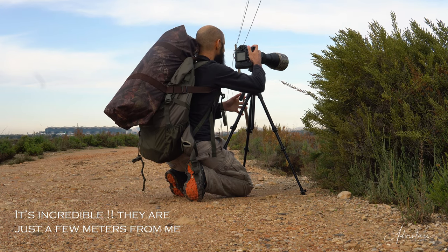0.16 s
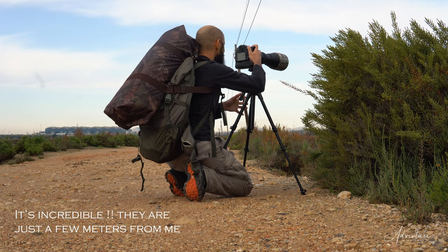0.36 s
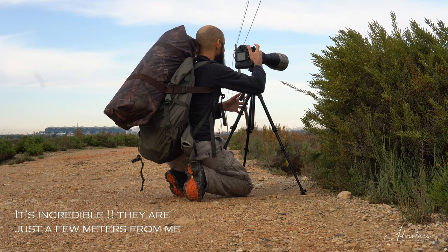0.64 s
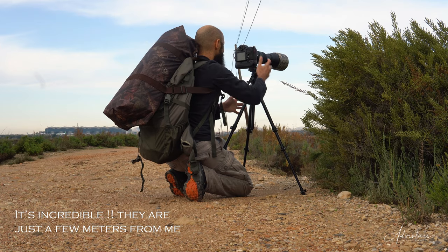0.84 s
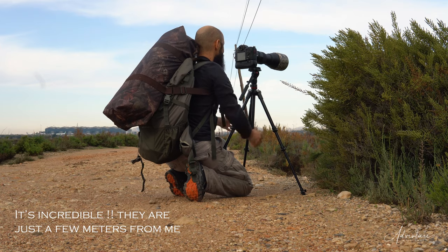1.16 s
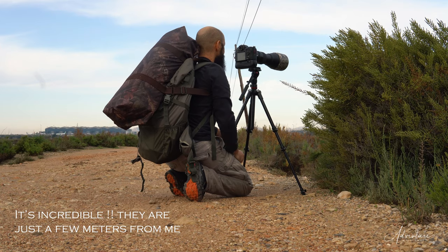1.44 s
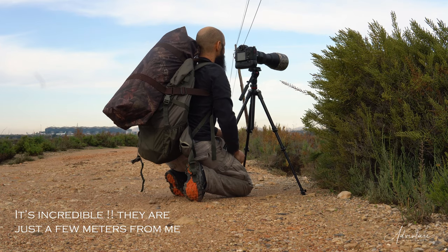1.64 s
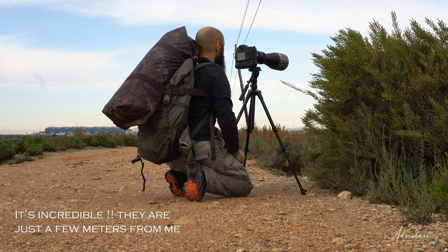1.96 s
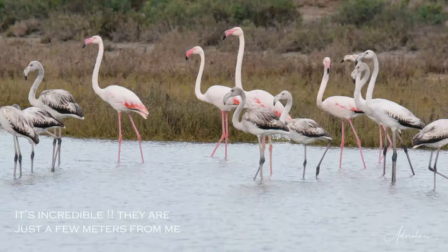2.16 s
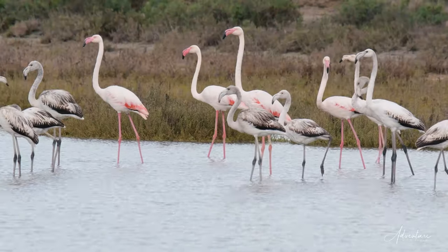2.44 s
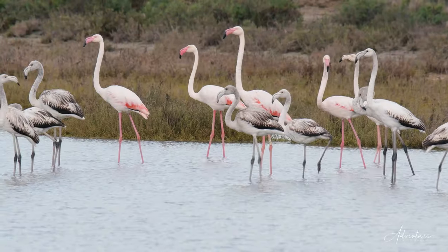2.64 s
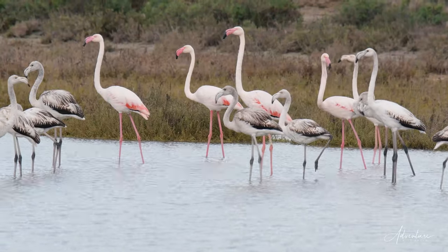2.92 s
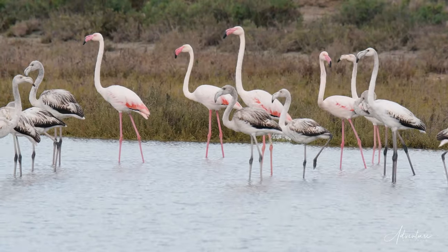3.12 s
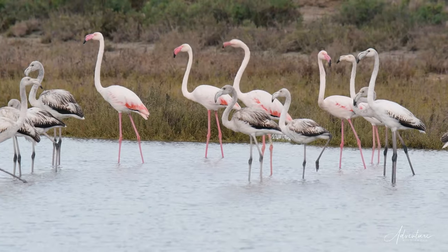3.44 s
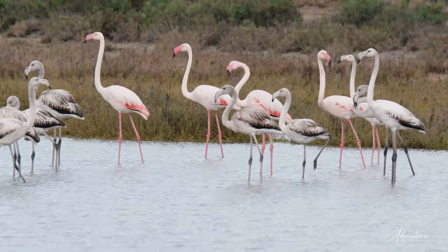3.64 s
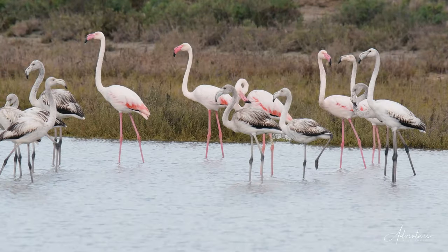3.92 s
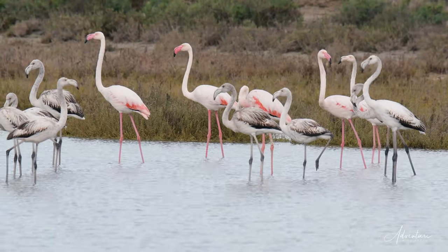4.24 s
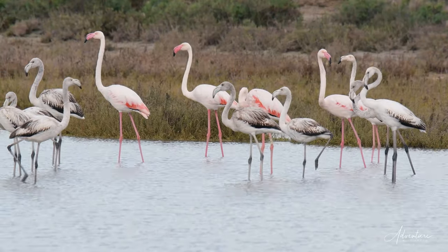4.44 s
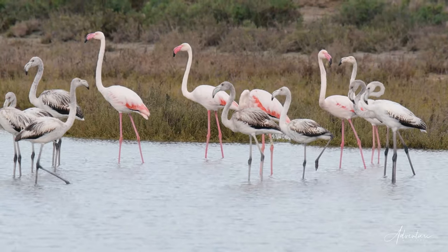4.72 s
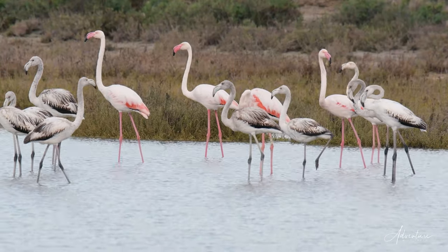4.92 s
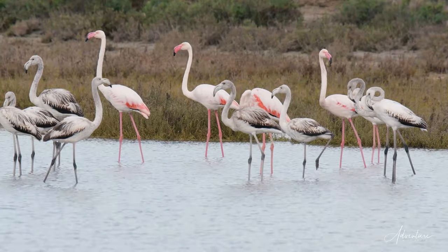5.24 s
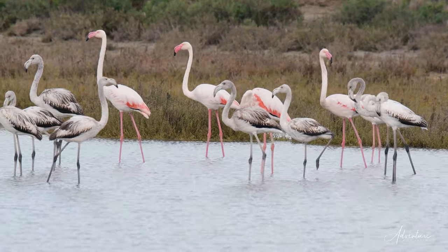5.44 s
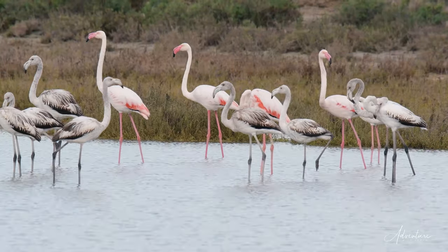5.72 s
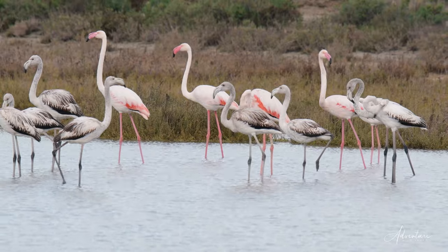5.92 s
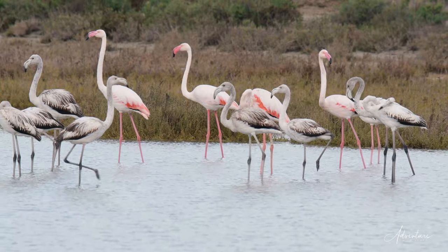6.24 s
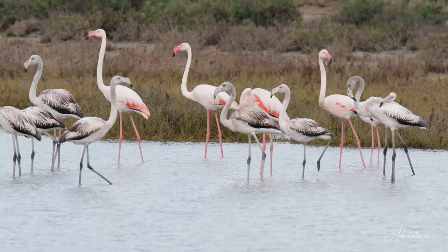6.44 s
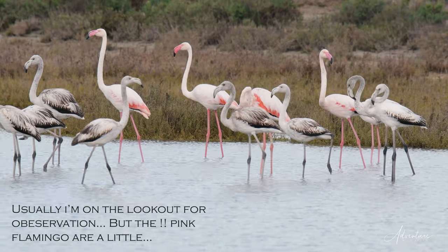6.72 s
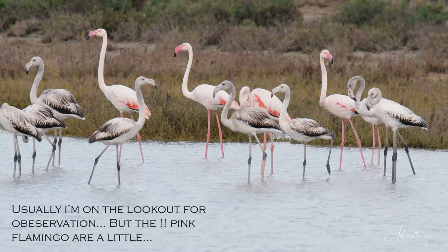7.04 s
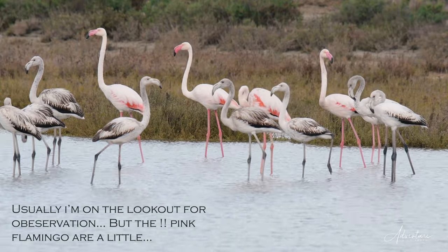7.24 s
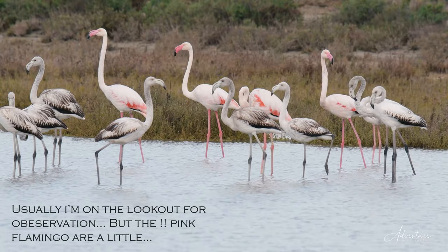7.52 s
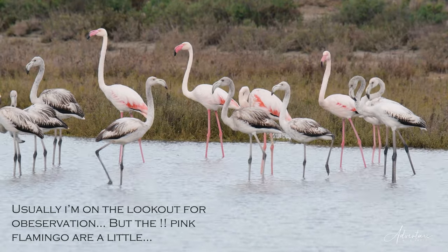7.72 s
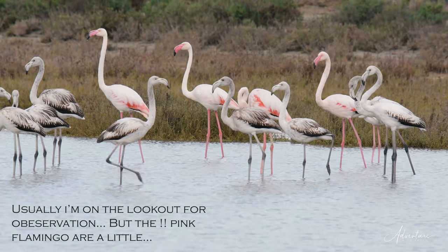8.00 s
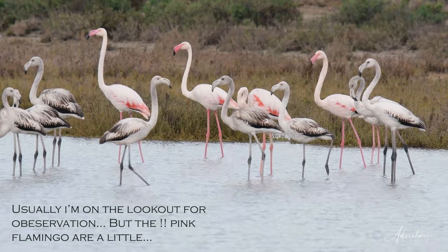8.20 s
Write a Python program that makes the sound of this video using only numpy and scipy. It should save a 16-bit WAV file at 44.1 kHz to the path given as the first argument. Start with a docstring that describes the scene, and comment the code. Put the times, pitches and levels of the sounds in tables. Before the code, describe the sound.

For about eight seconds, low soft wind rumbles over an open lagoon, slowly easing, with a brief gust at the very start, more around 1.8 to 2.2 and a weak one near 7.3. Behind it a far road drones continuously, its tyre roar swelling gently around 0.8, 3 to 4 and 5.7. Brush swishes and rustles lightly, fading overall, with leaves stirring again near 6.9. Thin high songbird chips, bending in pitch, start at 0.3 and 0.7 and recur sparsely. Small dry ticks fall between 0.8 and 2.5. A flamingo gives very short nasal, reedy yelps at 1.5, 2.2, 3.4, 5.5, 6.3 and 7.6, the first strongest and the fourth very faint. Hoarse, distant cries glide faintly around 3.0 to 3.7, 4.6, 6.6 and 7.3. The birds have a faint short outdoor tail; soft microphone hiss lies underneath.

```python
"""A lagoon in light wind, about eight seconds. Throughout, shaped noise makes a low, slowly easing rumble
of air, the drone and roar of a far-off road, and the swish and rustle of brush.
From the first moments a songbird chips now and then, in thin whistles that bend in pitch.
Short noise bursts tick between 0.8 and 2.5 s. From 1.5 s a wading bird gives six nasal yelps, each a
whistle over reedy harmonics, and from 3 s thin, hoarse glides are the cries of birds further off."""
import sys
import numpy as np
from scipy import signal
from scipy.fft import rfft, irfft
from scipy.io import wavfile
from scipy.ndimage import uniform_filter1d

SR = 44100
rng = np.random.default_rng(int(sys.argv[2]) if len(sys.argv) > 2 else 0)


def generate_wav(signal):
    """Clip the signal to [-1, 1] and save it as 16-bit WAV at the path in sys.argv[1]."""
    frames = np.transpose(np.atleast_2d(signal))
    scaled = np.clip(frames, -1, 1) * 32767
    pcm = np.round(scaled).astype(np.int16)
    wavfile.write(sys.argv[1], SR, pcm)


N = 369116
T = np.arange(N) / SR  # the time of every sample, in s


def undb(db):
    """Turn decibels into a gain."""
    return 10 ** (np.asarray(db) / 20)


def unit(x):
    """Scale a signal to an rms of 1."""
    return x / np.sqrt(np.mean(x ** 2))


def response(hz, points):
    """Gain at the given frequencies, read off a (frequency [Hz], level [dB]) spectrum."""
    point_hz, point_db = np.transpose(points)
    # a tiny offset keeps the logarithm of 0 Hz finite
    return undb(np.interp(np.log(hz + 1e-9), np.log(point_hz), point_db))


def noise(points):
    """Noise of rms 1 with the given spectrum, falling away above its last point."""
    hz = np.fft.rfftfreq(N, 1 / SR)
    roll_off = 1 / np.maximum(hz / points[-1][0], 1) ** 2
    white_spectrum = rfft(rng.standard_normal(N))
    return unit(irfft(white_spectrum * response(hz, points) * roll_off, N))


def walk(rate):
    """Random levels of rms 1, drawn `rate` times a second and smoothed twice."""
    hold = max(int(SR / rate), 2)
    steps = np.repeat(rng.standard_normal(N // hold + 1), hold)
    smooth = uniform_filter1d(uniform_filter1d(steps, hold), hold)
    return unit(smooth[:N])


def flow(points, db, flicker_db, rate):
    """Turbulent noise whose level flickers around a curve."""
    return noise(points) * undb(db + flicker_db * walk(rate))


def swell(peak_s, length_s):
    """A smooth rise and fall of power, 1 at its peak and above a half for its length."""
    return .5 ** ((2 * (T - peak_s) / length_s) ** 2)


def surges(steady_db, events):
    """Level in dB of a steady flow with swells on top; their powers add."""
    power = undb(steady_db) ** 2
    for peak_s, length_s, db in events:
        power = power + undb(db) ** 2 * swell(peak_s, length_s)
    return 10 * np.log10(power)


def add(out, start, sound):
    """Mix a sound in, starting at a time in s."""
    i = max(int(start * SR), 0)
    out[i:i + len(sound)] += sound[:N - i]


def sing(hz, jitter, taper=0.62):
    """Phase and soft envelope of one note; its pitch trembles by the fraction `jitter` (rms)."""
    tremble = unit(uniform_filter1d(rng.standard_normal(len(hz)), size=60))
    phase = 2 * np.pi * np.cumsum(hz * (1 + jitter * tremble)) / SR
    # the root of 2 gives a sine an rms of 1 where the envelope is flat
    return phase, np.sqrt(2) * signal.windows.tukey(len(hz), taper)


def wind():
    """Low eddies of air: an easing breeze with a few gusts."""
    # how the rumble spreads over pitch: (frequency [Hz], relative level [dB per Hz])
    wind_colour = [(8, -5.5), (22, 1), (38, -0.5), (55, 1.5), (75, -1.5), (105, -3.5), (150, -7),
                   (185, -13), (230, -26), (400, -42), (900, -54)]
    # gusts on top of the breeze: (time of the peak [s], length [s], rumble level [dB])
    gusts = [(0.156, 0.082, -21.5), (1.81, 0.16, -24.5), (2.147, 1.1, -28), (7.3, 0.33, -30.5)]
    start_db, ease_db_per_s = -26.5, 0.26
    db = surges(start_db - ease_db_per_s * T, gusts)
    return flow(wind_colour, db, flicker_db=0.13, rate=31)


def traffic():
    """Levels in dB of the tyre roar and its bright edge; a vehicle's roar falls in power with distance squared."""
    # vehicles that stand out:
    # (time when nearest [s], time spent near [s], tyre roar level [dB], bright edge level [dB])
    vehicles = [(0.05, 0.3, -44, -47), (0.82, 0.39, -43.5, -39.5), (3.1, 0.71, -44, -50.5),
                (3.7, 0.67, -42, -45), (5.72, 0.35, -42, -46), (6.4, 0.59, -46.5, -44.5),
                (7.4, 0.48, -47, -46)]
    steady_tyre_db, steady_edge_db = -43.5, -48
    edge_falloff = 1.27  # the edge fades with distance faster than the roar, by this power
    tyre, edge = undb(steady_tyre_db) ** 2, undb(steady_edge_db) ** 2
    for nearest_s, near_s, tyre_db, edge_db in vehicles:
        nearness = 1 / (1 + (2 * (T - nearest_s) / near_s) ** 2)
        tyre = tyre + undb(tyre_db) ** 2 * nearness
        edge = edge + undb(edge_db) ** 2 * nearness ** edge_falloff
    return 10 * np.log10(tyre), 10 * np.log10(edge)


def road():
    """Engines drone and tyres roar from far off; the roar and its bright edge swell as vehicles pass."""
    # spectra of the drone, the roar and its bright edge: (frequency [Hz], relative level [dB per Hz])
    drone_colour = [(100, -6.5), (185, 4), (240, 0), (295, -1.5), (330, -1.5), (400, -6.5), (500, -8),
                    (650, -10), (900, -13.5), (1600, -36.5)]
    tyre_colour = [(400, -21.5), (700, -5), (850, -4), (1000, -0.5), (1150, -7.5), (1400, -19), (2200, -38)]
    edge_colour = [(800, -17.5), (1100, 0), (1280, 0), (1500, -6), (1750, -14.5), (2100, -20.5),
                   (2500, -33), (4000, -46.5)]
    # level of the engine drone: (time [s], level [dB])
    drone_levels = [(0, -35.5), (1.7, -36), (2.9, -36.5), (4.4, -34), (5.7, -36.5), (6.2, -35), (8.37, -35)]
    drone_db = np.interp(T, *np.transpose(drone_levels))
    tyre_db, edge_db = traffic()
    drone = flow(drone_colour, drone_db, flicker_db=0.28, rate=13)
    tyres = noise(tyre_colour) * undb(tyre_db)
    edge = flow(edge_colour, edge_db, flicker_db=.5, rate=12)
    return drone + tyres + edge


def brush():
    """Stems swish less as the breeze eases; flurries stir them and set the fine leaves rustling."""
    # spectra of the stems and of the leaves: (frequency [Hz], relative level [dB per Hz])
    swish_colour = [(1200, -7), (1900, 5), (2400, 1.5), (2900, -4), (3800, -29), (7000, -25)]
    rustle_colour = [(2000, -10), (3200, 5.5), (4200, 0.5), (5000, -3.5), (5800, -10), (6600, -16.5),
                     (9000, -23), (15000, -29)]
    # flurries: (time of the peak [s], length [s], swish level [dB], rustle level [dB])
    flurries = [(0.15, 0.23, -59.5, -80), (0.72, 0.22, -62, -68), (1.25, 0.44, -65, -68.5),
                (2.174, 0.19, -62, -68.5), (2.8, 0.3, -68, -70.5), (4.55, 0.51, -64, -71.5),
                (6.85, 0.88, -75, -67), (8.25, 0.6, -72, -71)]
    swish_start_db, swish_ease_db_per_s = -59, 1.03
    calm_rustle_db = -70.5  # leaves between flurries
    peak_s, length_s, swish_db, rustle_db = np.transpose(flurries)
    stems_db = surges(swish_start_db - swish_ease_db_per_s * T, zip(peak_s, length_s, swish_db))
    leaves_db = surges(calm_rustle_db, zip(peak_s, length_s, rustle_db))
    stems = flow(swish_colour, stems_db, flicker_db=.7, rate=17)
    leaves = flow(rustle_colour, leaves_db, flicker_db=1.4, rate=27)
    return stems + leaves


def ticks():
    """Each small snap is a burst of noise in one broad, steep-sided resonance."""
    # dry ticks of twigs and grit: (start [s], centre frequency [Hz], width of one filter pass [Hz],
    # peak level [dB], time for the burst to decay to 1/e [s])
    snaps = [(.812, 4100, 1200, -53, .005), (.878, 5800, 3000, -56, .005), (1.028, 3600, 1200, -49, .005),
             (1.335, 4870, 1600, -48, 0.0027), (1.378, 5300, 3000, -57, .005),
             (1.808, 2280, 1500, -42, 0.0033), (2.511, 5260, 2000, -57, .005)]
    out, t = np.zeros(N), T[:SR // 20]
    for start, hz, width_hz, db, decay in snaps:
        b, a = signal.iirpeak(hz, hz / width_hz, fs=SR)
        burst = rng.standard_normal(len(t)) * np.exp(-t / decay)
        # two passes make the sides of the resonance steeper
        ring = signal.lfilter(b, a, signal.lfilter(b, a, burst))
        add(out, start, undb(db) * ring / np.abs(ring).max())
    return out


def far_birds(jitter=0.049):
    """Faint glides from one pitch to another, made hoarse by a strong tremble."""
    # thin slurred cries: (start [s], length [s], first pitch [Hz], last pitch [Hz], level [dB])
    cries = [(3.02, 0.066, 2800, 3000, -69), (3.03, 0.137, 1900, 2060, -62), (3.10, .07, 3900, 4080, -72),
             (3.16, .05, 3050, 3170, -69), (3.62, 0.16, 3180, 2850, -67), (4.60, .03, 4150, 3800, -68),
             (4.712, .03, 3950, 3900, -74), (6.60, .06, 3600, 3950, -69), (6.66, .065, 3450, 2550, -65),
             (7.252, 0.032, 5350, 5250, -68), (7.28, .055, 3450, 3150, -73)]
    out = np.zeros(N)
    for start, length, first_hz, last_hz, db in cries:
        glide_hz = np.geomspace(first_hz, last_hz, int(length * SR))
        phase, envelope = sing(glide_hz, jitter)
        add(out, start, undb(db) * envelope * np.sin(phase))
    return out


def songbird(sweep=12, crest_s=0.0056, jitter=.016):
    """Thin whistles, each part of a round-topped arch of pitch; `sweep` is in octaves a second."""
    # chips: (start [s], length [s], time of the crest [s], crest pitch [Hz], level [dB])
    chips = [(0.26, 0.024, .258, 6200, -61.5), (0.660, 0.041, .689, 6020, -63.5),
             (2.368, 0.041, 2.381, 6030, -69), (2.770, .016, 2.785, 5800, -72),
             (3.83, 0.05, 3.849, 5950, -68), (4.120, .030, 4.148, 6100, -68),
             (5.588, .020, 5.585, 5700, -70), (6.915, .040, 6.925, 5800, -75),
             (7.234, .036, 7.260, 5820, -67), (7.421, .018, 7.441, 5900, -71)]
    out = np.zeros(N)
    for start, length, crest, crest_hz, db in chips:
        t = start + T[:int(length * SR)]
        # octaves below the crest; crest_s sets how round the top is
        fall = sweep * (np.hypot(t - crest, crest_s) - crest_s)
        phase, envelope = sing(crest_hz * 2 ** -fall, jitter)
        add(out, start, undb(db) * envelope * np.sin(phase))
    return out


def wader(arch=0.086, whistle_jitter=0.0055, reed_jitter=0.015, throat_octaves=0.39, count=6):
    """The two sides of the syrinx sound together: a rising whistle and a reedy, arching stack of harmonics."""
    # yelps: (start [s], length [s], middle pitch of the whistle [Hz], its rise [octaves], whistle level [dB],
    # top pitch of the reed [Hz], reed level before the throat [dB], throat resonance [Hz])
    yelps = [(1.455, 0.057, 2300, .01, -47, 1153, -66, 3900),
             (2.24, 0.06, 2385, .04, -50.5, 1165, -66, 4780),
             (3.424, 0.053, 2190, 0.19, -55, 1102, -66.5, 4600),
             (5.455, 0.034, 2450, .3, -66, 1275, -70, 4350),
             (6.311, .040, 2330, 0.22, -55.5, 1134, -64, 3820),
             (7.552, .034, 2580, 0.27, -58.5, 1290, -68, 4150)]
    out, k = np.zeros(N), np.arange(1, count + 1)  # k numbers the harmonics
    for start, length, whistle_hz, rise, whistle_db, reed_hz, reed_db, throat_hz in yelps:
        u = np.linspace(-1, 1, int(length * SR))  # from the start to the end of the yelp
        phase, envelope = sing(whistle_hz * 2 ** (rise * u / 2), whistle_jitter)
        add(out, start, undb(whistle_db) * envelope * np.sin(phase))

        phase, envelope = sing(reed_hz * 2 ** (-arch * u ** 4), reed_jitter, taper=0.34)
        # the throat passes the harmonics that lie near its resonance
        throat = np.exp(-(np.log2(k * reed_hz / throat_hz) / throat_octaves) ** 2)
        reed = throat @ np.sin(np.outer(k, phase))
        add(out, start, undb(reed_db) * envelope * reed)
    return out


def open_air(x, wet_db=-17, t60=.3):
    """Banks and scrub scatter a faint, short tail that falls 60 dB in t60 seconds."""
    t = T[:SR // 2]
    tail = rng.standard_normal(len(t)) * np.exp(-np.log(1000) * t / t60)
    scattered = signal.fftconvolve(x, tail / np.linalg.norm(tail))[:N]
    return x + undb(wet_db) * scattered


def scene():
    """Wind, road and brush, with the birds on top."""
    background = wind() + road() + brush() + ticks()
    birds = far_birds() + songbird() + wader()
    return (background + open_air(birds))[None]


def record(dry):
    """The microphone adds its own hiss and the recorder cuts the top."""
    # spectrum of the hiss: (frequency [Hz], relative level [dB per Hz])
    hiss_colour = [(1000, -0.5), (5000, 4.5), (8000, 2.5), (11000, 1), (15500, 0.5)]
    hiss_db, top_hz = -72, 15550
    hiss = undb(hiss_db) * noise(hiss_colour)
    # a steep low-pass: 0.1 dB of ripple below the top, 80 dB down above it
    low_pass = signal.ellip(12, .1, 80, top_hz, fs=SR, output="sos")
    return signal.sosfilt(low_pass, dry + hiss)


dry = scene()
out = record(dry)
generate_wav(out)
```